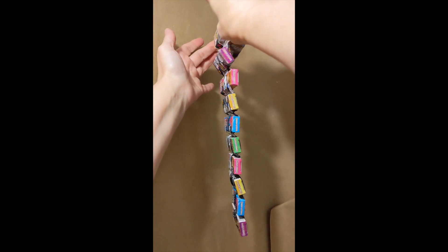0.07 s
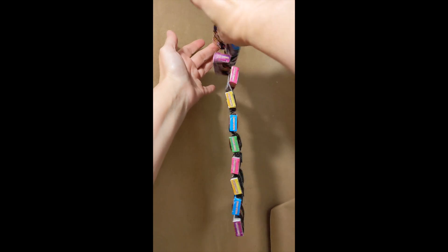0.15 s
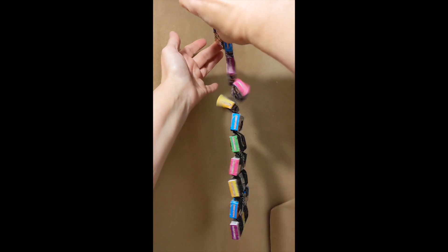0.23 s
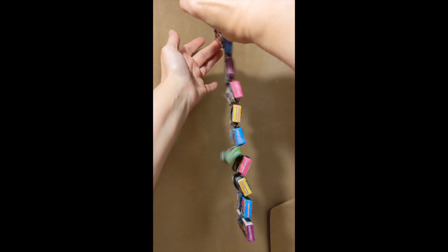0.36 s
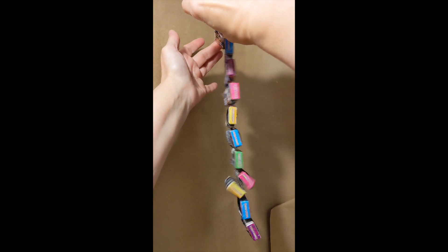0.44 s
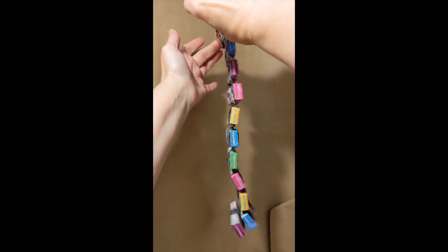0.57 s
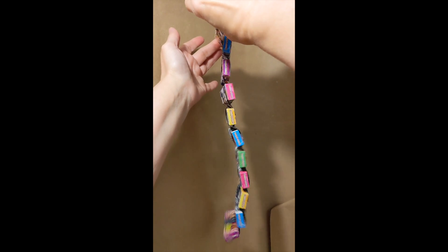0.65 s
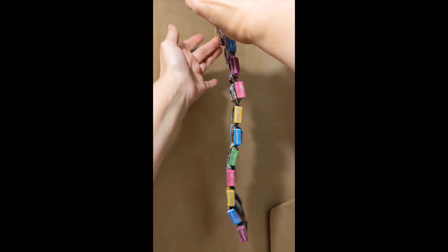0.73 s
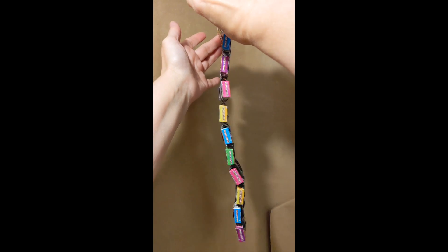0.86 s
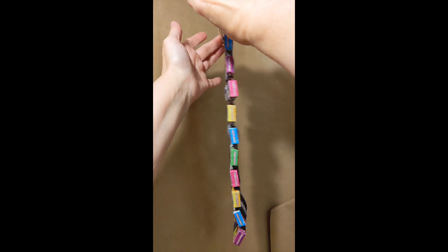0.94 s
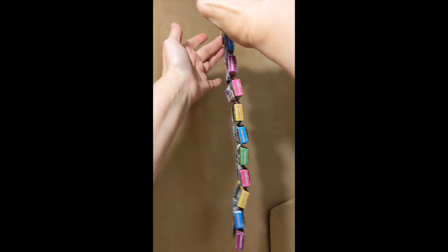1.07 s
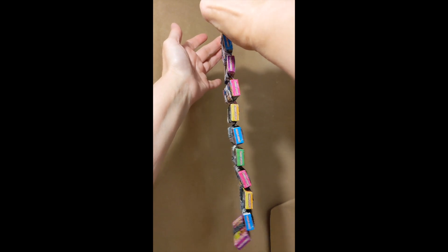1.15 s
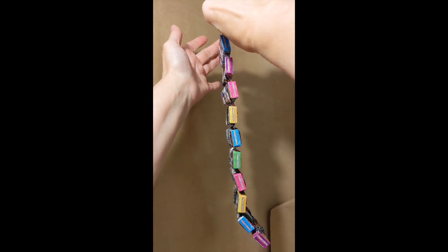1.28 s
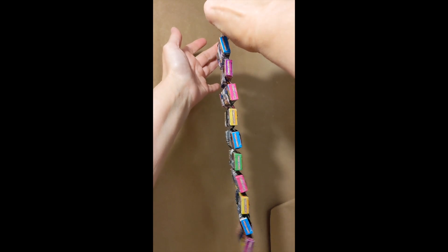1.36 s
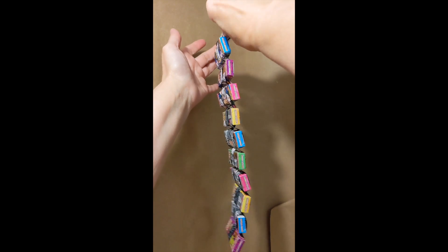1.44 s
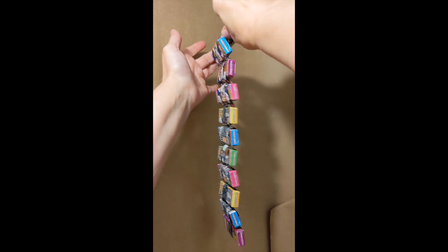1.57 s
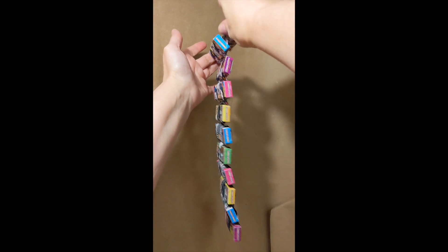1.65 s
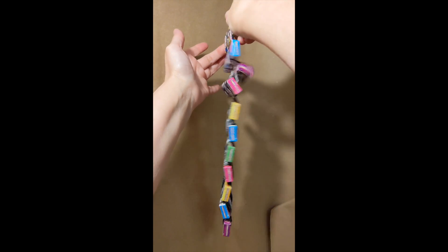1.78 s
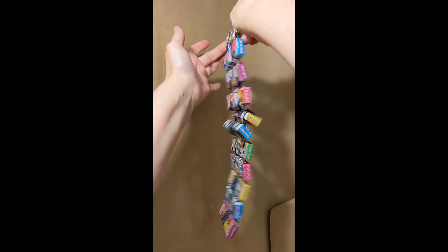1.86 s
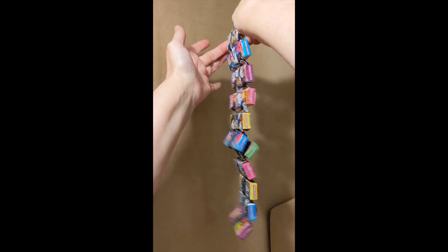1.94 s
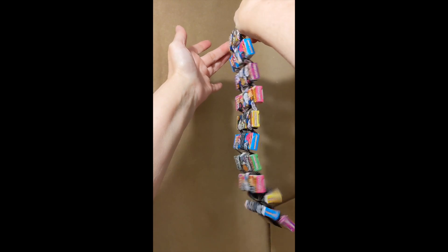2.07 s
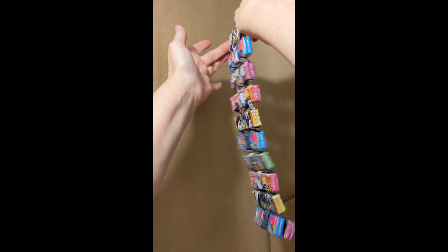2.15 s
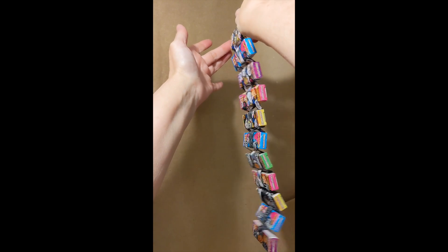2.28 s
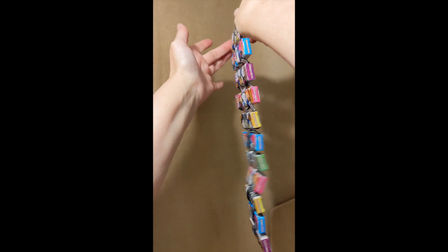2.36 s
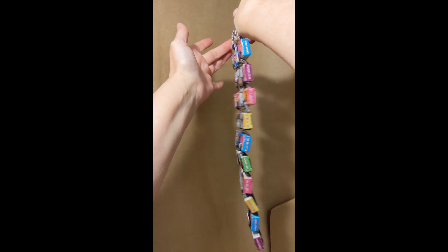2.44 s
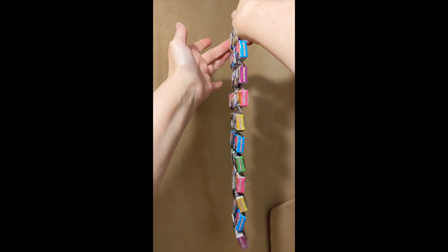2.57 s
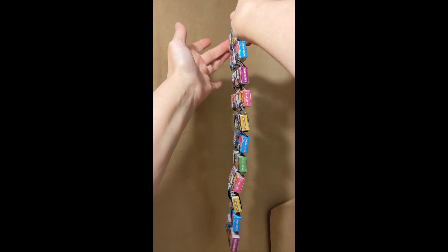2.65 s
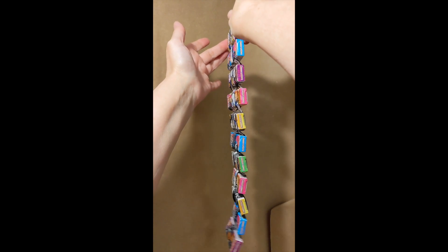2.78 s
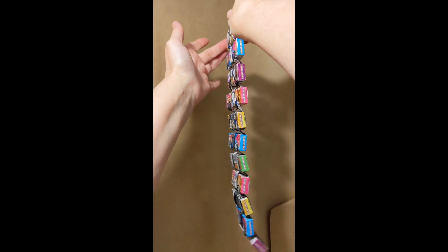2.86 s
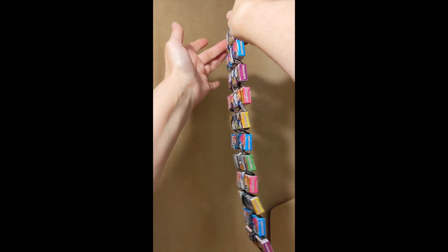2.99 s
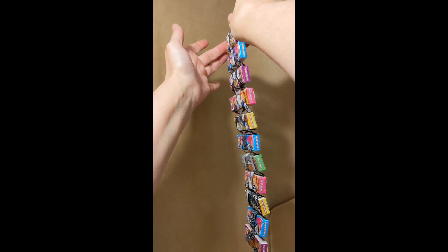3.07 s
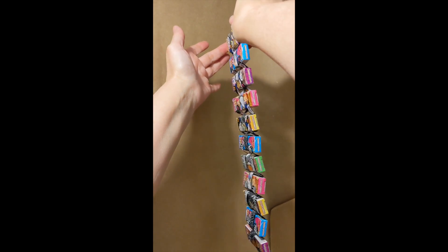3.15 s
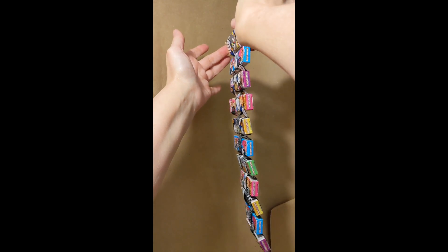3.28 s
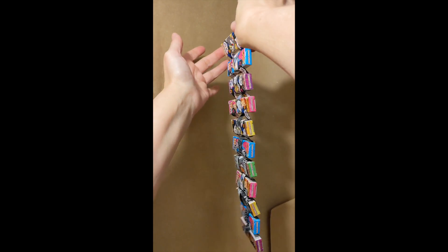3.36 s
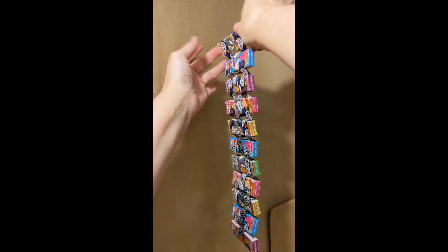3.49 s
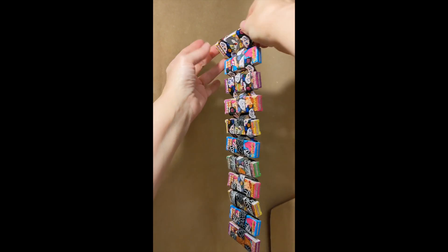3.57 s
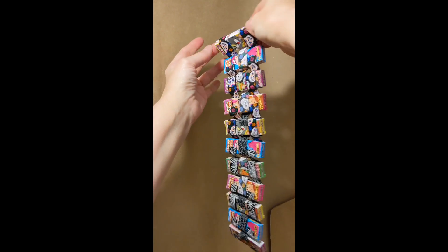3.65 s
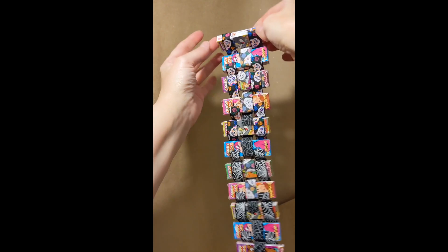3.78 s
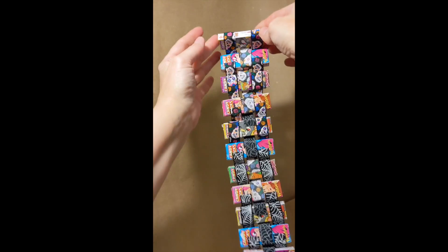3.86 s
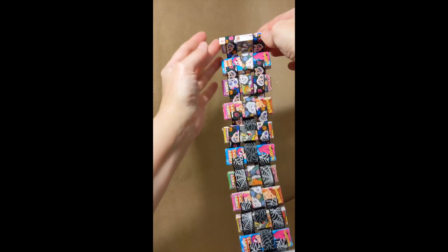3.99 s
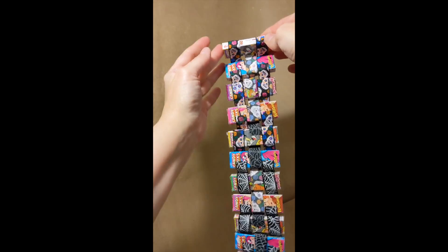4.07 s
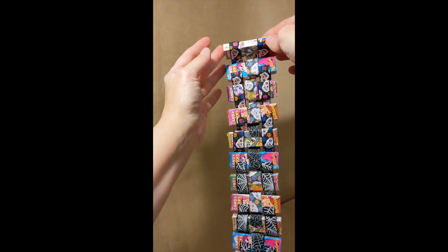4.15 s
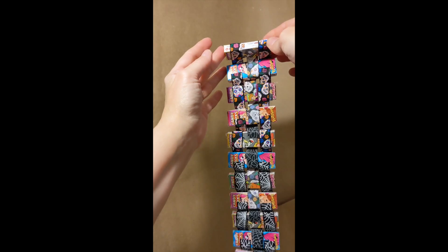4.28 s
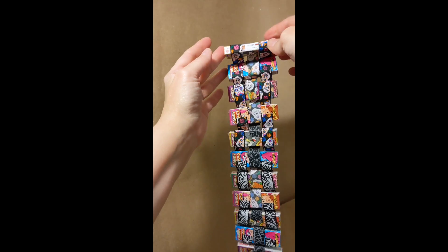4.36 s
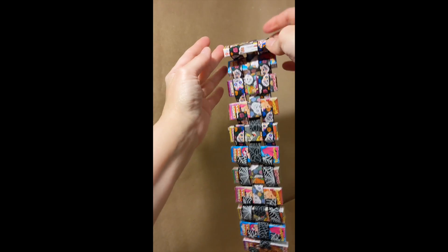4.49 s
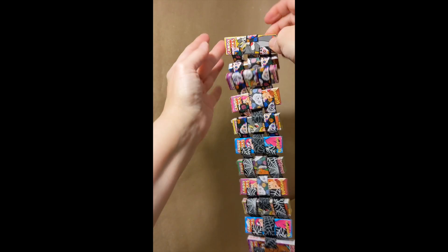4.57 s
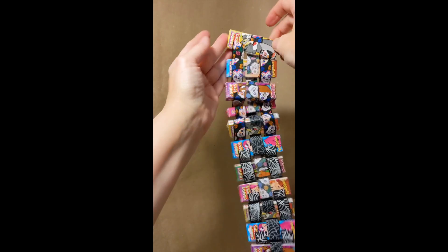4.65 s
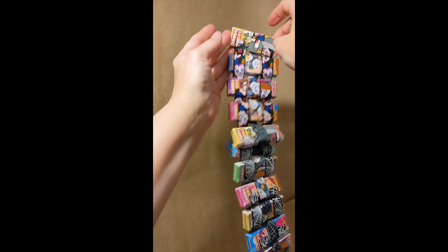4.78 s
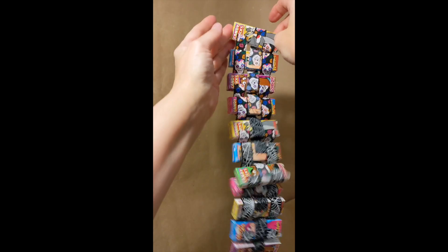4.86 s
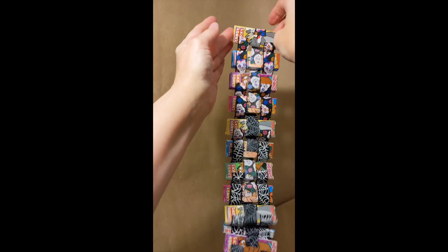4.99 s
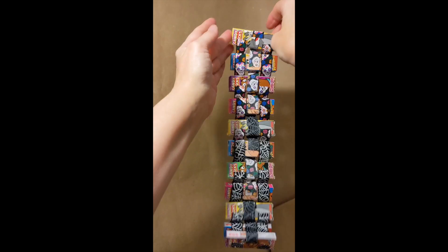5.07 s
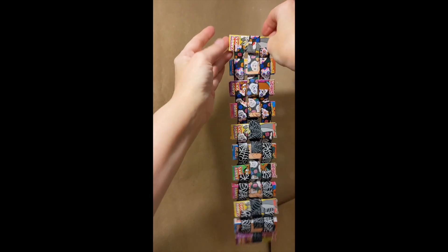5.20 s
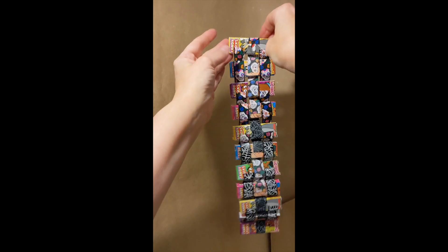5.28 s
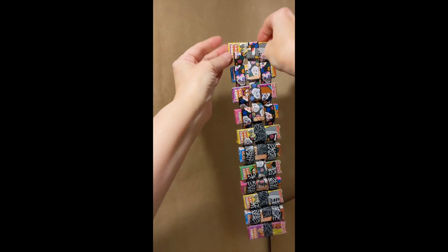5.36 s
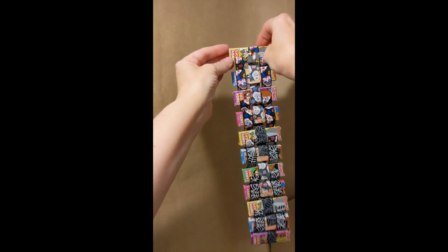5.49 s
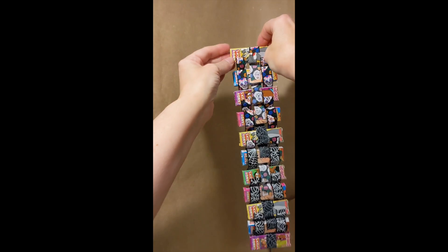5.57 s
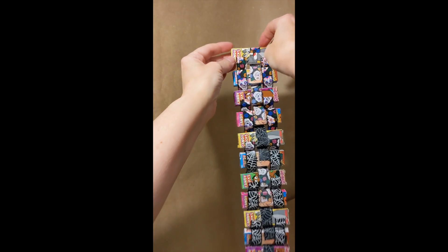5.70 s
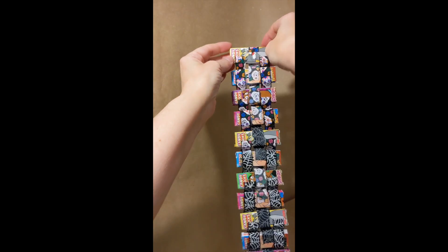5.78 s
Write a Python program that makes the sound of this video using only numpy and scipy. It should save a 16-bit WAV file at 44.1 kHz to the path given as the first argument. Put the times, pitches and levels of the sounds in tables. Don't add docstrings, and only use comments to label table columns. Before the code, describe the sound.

A quiet small room with faint air and a soft low hum, the microphone very close. From about 0.1 s light cardboard boxes on ribbons tumble, dry slaps and papery rattle growing denser and strongest around 0.4-0.7 s. From 0.8 to 1.75 s only thin, irregular ticks and soft ribbon rustle remain. A second cascade runs from 1.8 to 2.45 s, brisk and crisp, loudest near 2.2 s, then breaks into ticks that grow sparse through 4.5 s. A barely audible bump comes at 3.5 s; dull padded knocks lean left at 4.0, 4.2 and 4.3 s, the last strongest with a sharp click. The third tumble bursts in at 4.6 s, eases briefly, and clatters hard from 4.8 to 5.2 s. Ticks and rattle trail to the end, with low air buffeting on the left at 5.2-5.7 s and knocks near 5.4 and 5.55 s. Echo is short and faint.

```python
import sys
import numpy as np
from scipy import signal
from scipy.fft import rfft, irfft, next_fast_len
from scipy.io import wavfile
from scipy.ndimage import uniform_filter1d

SR = 44100
rng = np.random.default_rng(int(sys.argv[2]) if len(sys.argv) > 2 else 0)


def boost(x):
    u = np.asarray(x, float) / 20
    return 10 ** u


def dump(signal):
    limited = np.clip(np.atleast_2d(signal).T, -1, 1)
    pcm = np.round(limited * 32767).astype(np.int16)
    wavfile.write(sys.argv[1], SR, pcm)


N = 257103


def rms_one(x):
    return x / np.sqrt(np.mean(x ** 2) + 1e-20)


def in_time(rows, outside=None):
    s, *columns = np.transpose(rows)
    return [np.interp(np.arange(N) / SR, s, c, outside, outside) for c in columns]


def at_hz(points, hz):
    point_hz, value = np.array(points).T
    return np.interp(np.log(hz), np.log(point_hz), value)


def high_pass(x, order, hz):
    return signal.sosfilt(signal.butter(order, hz, "high", fs=SR, output="sos"), x)


def ring(clicks, hz, t60):
    r, w = boost(-60 / (t60 * SR)), 2 * np.pi * hz / SR
    return signal.lfilter([0, np.sin(w)], [1, -2 * r * np.cos(w), r * r], clicks + 1e-18)


def drift(rate, count):
    r = np.exp(-80 * np.pi * rate / SR)
    settle = 500
    slow = signal.lfilter([1], [1, -2 * r, r * r], rng.standard_normal((count, N // 40 + settle + 1)))
    slow = slow[:, settle:]
    return slow / slow.std()


def banded_noise(spectrum, top):
    # pitch in Hz, likeness from -1 to 1.
    likeness = [(60, 0.18), (130, 1), (290, 0.77), (640, 0.39), (1410, -0.66), (3100, 0.32), (6820, -0.13),
                (15000, 0.024)]
    out, edges = 0, 22 * 2 ** np.arange(0, top, .5)
    white = rng.standard_normal((2, 2, N))
    for k, (low, high) in enumerate(zip(edges, edges[1:])):
        band = signal.butter(2, [low, high], "band", fs=SR, output="sos")
        mid, side = signal.sosfilt(band, white[k % 2])
        hz = np.sqrt(low * high)
        alike = np.clip(at_hz(likeness, hz), -1, 1)
        stereo = np.sqrt(1 + alike) * mid + np.sqrt(1 - alike) * side * [[1], [-1]]
        out = out + boost(at_hz(spectrum, hz)) * stereo
    return rms_one(out)


def room_air():
    # pitch in Hz, level in dB per Hz.
    air_colour = [(15, -35), (25, -39), (64, -7), (148, 0), (267, -9), (433, -7.5), (700, -17), (1450, -21),
                  (1850, -7.5), (3170, -36), (3720, -46), (5580, -27.5), (8810, -30), (15500, -39.5)]
    level_db = -60.5 + 1.3 * drift(8.2, count=1)[0][np.arange(N) // 40]
    return boost(level_db) * banded_noise(air_colour, 9.6)


def hum():
    pitch_hz, width_hz, level_db = 61, 9, -61.5
    return boost(level_db) * rms_one(ring(rng.standard_normal(N), pitch_hz, np.log(1000) / np.pi / width_hz))


def draught(evenness=0.54):
    # time in seconds, level in dB.
    puff = [
        (5.1, -64),
        (5.212, -40.5),
        (5.218, -31),
        (5.36, -32.5),
        (5.38, -45),
        (5.455, -48.5),
        (5.52, -56.5),
        (5.58, -47.5),
        (5.75, -84),
    ]
    # pitch in Hz, level in dB per Hz.
    gust_colour = [(15, -45), (25, -5), (65, 9), (124, 4), (190, -5.5), (240, -20), (464, -64), (500, -28),
                   (650, -58), (1100, -120)]
    eddies = banded_noise(gust_colour, 4.6)
    eddies = eddies / uniform_filter1d(eddies ** 2, SR // 30) ** (evenness / 2)
    left, right = eddies * boost(in_time(puff, -120)[0] + 5.5)
    return np.array([left, boost(-30) * right])


def knocks(thud_s=0.033, contact_s=0.0034, chatter_s=0.0044, pan_db=4.5, lead=16):
    # start in seconds, peak in dB, thud in Hz, snap in dB, snap in Hz.
    blows = [
        (3.53, -50.5, 240, 7.5, 545),
        (3.9761, -32, 243, -5, 1099),
        (4.182, -31.5, 159, -7.5, 800),
        (4.188, -40, 75, -9, 298),
        (4.2803, -26.5, 266.8, 5.5, 1335),
        (5.388, -32, 271.1, 1.5, 630),
        (5.559, -30.5, 255, 17, 1237),
    ]
    # pitch as a ratio, level in dB, fade by 60 dB in seconds.
    snap_modes = [(0.36, -29, 0.023), (0.58, -3, 0.063), (.8, -26, 0.012), (1, 11.5, 0.025),
                  (1.22, 3, 0.02), (1.71, -14, 0.026)]
    out, t = np.zeros((2, N)), np.arange(int(.15 * SR)) / SR
    soft = np.sin(np.pi * np.minimum(t / contact_s, 1)) ** 2
    chances = rng.standard_normal((len(blows), len(t)))
    for (s, peak_db, thud_hz, snap_db, snap_hz), luck in zip(blows, chances):
        blow = 0.12 * luck * np.exp(-t / chatter_s) + (t == 0)
        blow = signal.lfilter([.09], [1, -1.4, .49], blow)
        snap = -sum(boost(db) * rms_one(ring(blow, ratio * snap_hz, t60)) for ratio, db, t60 in snap_modes)
        push = high_pass(np.gradient(soft), 2, 0.7 * thud_hz)
        thud = ring(push, thud_hz, thud_s * boost(0.6 * min(snap_db, 0)))
        overtone = ring(blow, 2.0 * thud_hz, 1.5 * thud_s)
        parts = (thud, 0), (overtone, -12.0), (snap, snap_db)
        hit = sum(boost(peak_db + db) * v / np.abs(v).max() for v, db in parts)
        for side, late in enumerate((0, int(lead))):
            at = int(s * SR) + late
            out[side, at:at + len(t)] += hit * boost(pan_db * (.5 - side))
    return high_pass(out, 2, 45)


def ticks():
    # start in seconds, peak in dB, breadth in dB of the hollow and crisp
    # parts, pitch in Hz.
    tick_rows = [(0.8219, -40.5, -37, 2330), (0.8772, -38, -15, 2600), (0.968, -50.5, 9, 1922),
                 (1.0002, -42.5, 3, 1809), (1.0561, -36.5, -4.5, 1790), (1.121, -43, 0, 2410),
                 (1.1624, -44, -44, 2431), (1.1745, -37, -46, 2910), (1.194, -55, -34, 1870),
                 (1.4201, -35.5, -25, 2450), (1.44, -46, -20, 2031), (1.4769, -42, -10, 1960),
                 (1.5734, -40.5, -5, 1840), (1.6603, -42.5, 2, 2170), (1.6894, -42.5, 0, 1920),
                 (2.541, -33.5, -6, 2140), (2.554, -31.5, -18, 3080), (2.582, -40.5, -23, 2000),
              (2.64, -40, -15, 3060), (2.655, -37, -9, 1730), (2.6755, -38.5, -11, 1912),
              (2.773, -43, -7, 1930), (2.8318, -41, -22, 2490), (2.854, -48.5, -24, 1870),
              (2.9257, -39, -16, 1940), (2.962, -46, -30, 1863), (3.0088, -47.5, -25, 1870),
              (3.0214, -43, -4, 1904), (3.09, -42, -9, 1860), (3.1094, -43.5, -29, 2123),
              (3.242, -45.5, -5, 2122), (3.2684, -41.5, -19, 2060), (3.331, -40.5, -26, 2520),
              (3.411, -42.5, -24, 3280), (3.558, -43, -22, 1942), (3.6044, -47, -4, 1639),
              (3.7673, -38.5, -19, 2080), (4.037, -42.5, -34, 1769), (4.2805, -21, -7, 3280),
              (4.356, -45, -51, 2600), (4.4504, -45.5, -18, 1590), (4.509, -40.5, -8, 1980),
              (4.5405, -42, -4, 2526),
                 (5.2231, -34, -31, 1600), (5.2622, -30.5, -16, 1561), (5.2932, -30, -3.5, 1999),
              (5.339, -35.5, -10, 2360), (5.369, -39, -54, 2940), (5.4071, -33.5, -20, 2900),
              (5.4349, -34.5, -14, 3100), (5.474, -35, -10, 1660), (5.5355, -44, -30, 3150),
              (5.6177, -37, -45, 3020), (5.639, -38, -15, 3240), (5.6612, -39.5, -3, 2010),
              (5.681, -36.5, -26, 2130), (5.691, -35, -20, 3050), (5.741, -41, -9, 1800),
              (5.7692, -39.5, -10, 1960), (5.7933, -38, -8, 1930),
                 (0.1057, -39.5, -13, 2980), (0.1243, -42, -16, 1960), (0.752, -40, -14, 1920),
             (0.7801, -43, -14, 1760), (0.867, -40.5, -20, 2990), (0.8868, -48, -18, 2930),
             (0.8972, -51, -14, 3180), (0.9764, -44, -12, 1900), (1.0107, -56, -11, 1930),
             (1.0855, -48, 6, 1961), (1.1373, -39.5, -16, 1850), (1.1832, -45, -2, 1960),
             (1.3878, -65, -14, 2840), (1.4585, -51, -16, 1900), (1.6352, -56, -14, 1960),
             (1.648, -47, -21, 2250), (1.7146, -44.5, 2, 2710), (1.7574, -49.5, 6, 2334),
             (2.4497, -32.5, -8, 1820), (2.5255, -39.5, -9, 1988), (2.6014, -50, -14, 2080),
             (2.6307, -47.5, 0, 1720), (4.184, -39.5, -8, 2200), (3.9, -57, 0, 2024),
             (2.7935, -50, -18, 1884), (2.8853, -49, -14, 1610), (2.9087, -61, -14, 1989),
             (2.9931, -50, -20, 1860), (3.2136, -46.5, -5, 1850), (3.398, -51, -4, 2030),
             (3.4488, -45, -5, 1993), (3.5078, -43.5, -17, 2040), (0.4972, -29, -14, 2900),
             (0.629, -47, -16, 2800), (0.645, -47, -14, 2500), (.729, -33, -18, 2400),
             (3.687, -53, -5, 1760), (3.9235, -51, -2, 2200), (4.0506, -45, -16, 2470),
             (4.3873, -56, -16, 2620), (4.4202, -49, -26, 2208), (4.5645, -56, -14, 2134),
             (4.582, -44, -6, 3300), (5.2405, -33.5, -16, 2190), (5.2774, -34, -11, 1980),
             (5.4939, -44, -9, 1573), (5.575, -39, -19, 1676)]
    return tick_rows


def slaps():
    # start in seconds, peak in dB, hollow part in dB, crisp part in dB, cluster length in seconds.
    tumble_1 = [(0.078, -47, -18, 4, 0.0056), (0.1625, -34.5, -19, -1.5, 0.0075),
                (0.177, -44.5, -5, 7, 0.027), (0.2314, -34.5, -11, -3, 0.0089),
                (0.2458, -46.5, -12, 9.5, 0.0051), (0.293, -34.5, -2, 3, 0.0088),
                (0.303, -31, -15, -13, 0.0071), (0.329, -28.5, -8.5, -5, 0.012),
                (0.3706, -28, -13, 1.5, 0.0062), (0.4052, -35, -13, -10, 0.008),
                (0.425, -25, -6, -0.5, 0.0038), (0.5137, -29.5, -15, -7, 0.013),
                (0.5312, -22, -11, -8.5, 0.0043), (0.5668, -43, 2, -15, 0.0037),
                (0.5945, -21, -8, -6, 0.014), (0.627, -42, -30, -23, 0.0082),
                (0.671, -32.5, -3, -7.5, 0.013), (0.680, -26.5, -7, -16, 0.01),
                (0.7072, -30, -22, -0.5, 0.006), (0.7509, -37, -13, -20, 0.0028)]
    tumble_2 = [(1.8004, -30, -5.5, -7.5, 0.0073), (1.809, -34, -2.5, 0, 0.03),
                (1.8416, -28, -10, 0.5, 0.0091), (1.87, -27.5, -3.5, -1.5, 0.015),
                (1.905, -26.5, -6, 0.5, 0.013), (1.9714, -26, -3, -2, 0.005),
                (1.9925, -32.5, -20, -7, 0.0072), (2.0231, -27.5, -15, -2.5, 0.0062),
                (2.0454, -24, -27, -5, 0.013), (2.0752, -29, -9, 3.5, 0.0025),
                (2.1093, -48, -17, -15, 0.0059), (2.1453, -25.5, -13, -2.5, 0.012),
                (2.1756, -27, -5.5, 0.5, 0.012), (2.2217, -20, -27, 0, 0.0095),
                (2.232, -22, -5.5, -6, 0.0023), (2.2841, -29.5, -7, -10, 0.012),
                (2.3521, -38, -23, -8, 0.0058), (2.3656, -33, -17, -16, 0.0096),
                (2.3752, -29, -3, -8.5, 0.0097), (2.3873, -30.5, -21, -14, 0.0052),
                (2.4031, -29.5, -18, -16, 0.012), (2.4612, -30.5, -22, -10, 0.01)]
    tumble_3 = [(4.6064, -24.5, -4.5, -3, 0.0024), (4.6107, -29, -23, 8.5, 0.0052),
                (4.614, -21.5, -6, -2, 0.003), (4.6202, -31.5, -1, 3, 0.01), (4.6857, -33.5, 10, 5, 0.002),
                (4.690, -31.5, -5, 3, 0.004), (4.7167, -35.5, -7, -2, 0.0094), (4.8317, -31, 1, -1, 0.005),
                (4.8553, -28, -7, 0, 0.0088), (4.873, -26, -8.5, -25, 0.007), (4.907, -20, -10, -10, 0.017),
                (4.9661, -30, -5.5, -6.5, 0.02), (4.987, -32.5, -12, -6, 0.0077),
                (5.023, -28, -19, -23, 0.004), (5.0486, -26, -21, -5.5, 0.005),
                (5.0519, -27, -20, -15, 0.0059), (5.078, -28, -2.5, -2.5, 0.005),
                (5.0821, -28.5, -1.5, -5, 0.0047), (5.1176, -32.5, -10, -3.5, 0.004),
                (5.1559, -24.5, -4, -21, 0.014), (5.1701, -31, -15, -7, 0.0037),
                (5.149, -35, -4, -3, 0.006), (5.1928, -24, -2, 4, 0.0025), (5.197, -24.5, -20, 3, 0.0012),
                (5.5592, -33.5, -10, -15, 0.0087)]
    tick_s = .0032
    short = [(s, db - 3.5, -7.5 + 0.37 * wide_db, wide_db, tick_s) for s, db, wide_db, _ in ticks()]
    return [*tumble_1, *tumble_2, *tumble_3, *short]


def shaking(crest_db=-5.5, slow_rise=0.52, clump_db=0.0, clumps_hz=45, surge_db=-0.8, surges_hz=9):
    # time in seconds, rattle level in dB.
    swing = [(0, -64.5), (.1, -59), (.4, -44.5), (.65, -59.5), (1.2, -77), (1.35, -70.5), (1.65, -60),
             (1.77, -61), (2.09, -38), (2.33, -52.5), (2.72, -73), (3.2, -69), (4.12, -59), (4.48, -69.5),
             (4.66, -45), (5.05, -43.5), (5.5, -60.5), (5.83, -57.5)]
    # start in seconds, peak in dB, hollow part in dB,
    # crisp part in dB, length in seconds.
    swells = [(0.488, -32, -10, -8, 0.025), (0.702, -21, -38, -28, 0.0024), (.895, -40, -16, -13, 0.047),
              (1.181, -41, -28, -24, 0.032), (1.292, -38.5, -2, -3, 0.012), (2.204, -23, -14, -17, 0.018),
              (2.298, -33, -16, -4, 0.014), (3.718, -43.5, -17, -6, 0.093), (4.03, -55.5, -6, 4, 0.11),
              (4.603, -34, -15, 2, 0.0082), (4.82, -36.5, -1, 1.5, 0.017), (5.186, -25, -3, -16, 0.008),
              (5.384, -29, -3.5, -31, 0.017)]
    # start in seconds, peak in dB, hollow part in dB, crisp
    # part in dB, length in seconds.
    more_swells = [(.005, -45, 8, -3, 0.0031), (0.135, -50, -14, 6.5, 0.019), (0.337, -32.5, -16, -9, 0.052),
                   (0.46, -36, -9, -14, 0.024), (0.777, -43, -2.5, -6.5, 0.039),
                   (0.918, -41.5, -2.5, -4.5, 0.018), (1.015, -45, -3.5, -6, 0.091),
                   (1.094, -43.5, -6, -20, 0.027), (1.21, -48, -19, -7, 0.035), (1.446, -58, -12, -19, .04),
                   (1.653, -50.5, -25, 1.5, 0.054), (2.495, -48, -20, -13, 0.032), (2.592, -46, -7, -14, .03),
                   (2.689, -46.5, -6, -20, 0.017), (2.756, -49.5, -18, -5, 0.023), (2.845, -49, -12, -21, 0.021),
                   (3.115, -48.5, -15, -19, 0.042), (3.42, -55, -12, -7, 0.064), (3.592, -49, -25, -2, 0.034),
                   (4.531, -45.5, 6.5, -2, 0.0051), (4.625, -42, -8, 6.5, 0.041), (4.726, -41.5, 2, 2, 0.027),
                   (4.799, -52, -12, -11, .03), (4.938, -43, -13, -8, 0.019), (5.005, -30, -19, -12, 0.024),
                   (5.091, -31, -10, 0.5, 0.014), (5.2, -46, -12, -15, 0.013), (5.316, -38, -18, -17, .03),
                   (5.59, -43.5, -0.5, -24, .025)]
    after_db, after_s = -15, 0.022
    soft_s = .014
    scuff_lead_s = .0014

    lumps_db = clump_db * drift(clumps_hz, count=1) + surge_db * drift(surges_hz, count=1)
    lumps_db = lumps_db[0][np.arange(N) // 40]
    usual_db = -52
    swing_db = in_time(swing)[0] - usual_db
    colour_db = np.array([[0], [-7.5], [-8]])
    follows = [[1], [0.82], [0.83]]
    power = boost(2 * (colour_db + usual_db + swing_db * follows))
    clusters, t = 0 * power, np.arange(int(.15 * SR)) / SR
    since = np.maximum(t - scuff_lead_s, 0)
    lead = scuff_lead_s * np.array([[0], [0], [1]])
    slower = np.array([[1], [1], [1.3]])
    for s, peak_db, hollow_db, crisp_db, length in [*slaps(), *swells, *more_swells]:
        length = max(length, .001)
        rise = slow_rise * min(length / soft_s, 1)
        at = max(int((s - rise * length - scuff_lead_s) * SR), 0)
        start = np.clip((t - scuff_lead_s + lead) / (rise * length * slower + lead), 0, 1) ** 2
        parts_db = peak_db + crest_db + np.array([[0], [hollow_db], [crisp_db]])
        cluster = boost(2 * parts_db) * start * np.exp(-2 * since / length)
        chatter = boost(2 * (peak_db + after_db + colour_db)) * start * np.exp(-2 * since / after_s)
        clusters[:, at:at + len(t)] += cluster[:, :N - at]
        power[:, at:at + len(t)] += chatter[:, :N - at]
    return np.sqrt(power * boost(2 * lumps_db) + clusters)


def boxes(per_s=1300, uneven_db=3.0, per_mode_db=1.5, colour_db=3.0, sway_db=1.0, cycles=26.4, scuff=0.85,
          alike=0.61, lag=6.04, lag_spread=3.2):
    modes = np.array([270, 350, 440, 540, 650, 780, 930, 1090, 1260, 1480, 1650, 1800, 1910, 2100, 2330,
                      2570, 2880, 3220, 3460, 4050, 4500, 5000, 5700, 6500, 7400, 8400, 9700, 11200, 13000,
                      15000])
    # pitch in Hz, level in dB per Hz.
    card = [(250, -23.5), (440, -9), (620, -6), (900, -11.5), (1100, -7.5), (1450, -9.5), (1850, 7),
            (2200, 1.5), (2800, 5), (3400, 0), (3900, -22), (4800, -17.5), (6700, -19.5), (10800, -31.5),
            (15500, -38.5)]
    # pitch in Hz, left over right in dB.
    ports = [(60, 0.0), (110, 0.0), (200, -8), (380, 3.5), (700, 0), (1290, 2.5), (2380, -5), (4400, 1),
             (8120, -1.5), (15000, 1.5)]

    touch = rng.random(N) < per_s / SR
    sizes = boost(uneven_db * np.minimum(rng.exponential(1, N), 4))
    first = (np.array(slaps())[:, 0] * SR).astype(int)
    touch[first], sizes[first] = True, boost(6)
    at = np.flatnonzero(touch)
    firm = np.isin(at, first)
    part = np.where(modes < 1400, 1, np.where(modes > 3700, 2, 0))
    share = boost(at_hz(card, modes)) ** 2 * np.gradient(modes)
    which_box = colour_db * drift(45.0, count=len(modes))[:, at // 40]
    sway = boost(sway_db * drift(34.0, count=1)[:, at // 40] * [[.5], [-.5]])
    paper = scuff * rng.standard_normal((2, N))
    force, out, alike = shaking(), np.zeros((2, N)), np.clip(alike, 0, 1)
    for hz, p, w, favour_db in zip(modes, part, share, which_box):
        other, spread = rng.standard_normal((2, N // 16))[:, :len(at)]
        push = np.where(firm, 1, np.sign(spread[::-1]))
        near = alike ** (hz / (hz + 700))
        hits = np.array([push, near * push + np.sqrt(1 - near ** 2) * other])
        hits = hits * sway * sizes[at] * boost(per_mode_db * spread + favour_db)
        hits = hits / np.sqrt(np.mean(hits ** 2) * len(at) / N)
        clicks = np.roll(paper, int(hz), axis=1) * (p == 2)
        clicks[:, at] = hits / (1 + (hz / 11000) ** 2)
        t60 = cycles / hz * (hz / 2000) ** 0.058
        level = np.sqrt(w / share[part == p].sum()) * boost(at_hz(ports, hz) * np.array([[.5], [-.5]]))
        rung = ring(clicks * force[p], hz, t60) * level / np.sqrt(t60 * SR / (4 * np.log(1000)))
        out[0] += np.roll(rung[0], int(lag + lag_spread * other[0]))
        out[1] += rung[1]
    out = out - 0.35 * signal.lfilter(*signal.iirpeak(3800, 8, SR), out)
    return high_pass(out, 2, 260)


def pings(ping_db=-9.0, narrow=0.33, panel_db=-4.5, chatter_s=0.0015, lag=6):
    # start in seconds, peak in dB, pitch in Hz.
    panels = [(0.2901, -30, 1830), (0.3715, -30, 1850), (0.423, -33, 2800), (0.4329, -20, 1970),
              (0.5311, -12.5, 1781), (0.595, -27, 1970), (0.6814, -24, 1090), (0.7018, -21.5, 1235),
              (0.708, -15.5, 1770), (1.8392, -21.5, 2240), (1.8714, -22, 1990), (1.9061, -18, 1980),
              (1.9718, -22, 1760), (2.0462, -26, 1829), (2.0747, -29, 2160), (2.1103, -35, 1860),
              (2.1762, -18, 1790), (2.2202, -35, 2480), (2.2264, -33, 1900), (2.281, -28, 1847),
              (4.6063, -30, 1110), (4.6146, -13.5, 2470), (4.855, -18.5, 1840), (4.906, -13, 2420),
              (4.965, -26, 1990), (5.0481, -25, 1470), (5.0546, -13, 1670), (5.0809, -15, 1894),
              (5.12, -23, 2220), (5.1547, -38, 1922), (5.1717, -18, 1810), (5.185, -18, 1850),
              (5.1965, -9, 1820), (5.1945, -15, 6600), (4.6127, -22, 7040), (2.2045, -28, 5200),
              (4.2792, -28, 5920)]
    ping_t60_s = .015
    out, t = np.zeros((2, N + SR)), np.arange(int(.04 * SR)) / SR
    rows = ticks() + [(s, db, panel_db, hz) for s, db, hz in panels]
    chances = rng.standard_normal((len(rows), len(t)))
    for (s, db, wide_db, hz), luck in zip(rows, chances):
        touch = luck * np.exp(-t / chatter_s) + 3.4 * (t == 0)
        ping = ring(touch, hz, ping_t60_s)
        for side, late in enumerate((int(lag), 0)):
            at = int(s * SR) + late
            out[side, at:at + len(t)] += boost(db + ping_db - narrow * wide_db) * ping / np.abs(ping).max()
    return out[:, :N]


def room(x):
    t60_s, wall_cut_hz = 0.12, 7200
    size = next_fast_len(N + SR // 2)
    w = 2 * np.pi * np.arange(size // 2 + 1) / size
    dull = 1 / (1 + 1j * w * SR / (2 * np.pi * wall_cut_hz))
    walls = np.zeros((2, len(w)), complex)
    for k, lag in enumerate((rng.uniform(0.0044, .022, 8) * SR).astype(int)):
        loop = boost(-60 * lag / SR / t60_s) * dull * np.exp(-1j * w * lag)
        walls[k % 2] += (-1) ** (k // 2) * loop / (1 - loop)
    return irfft(rfft(x.mean(axis=0), size) * walls, size)[:, :N]


def scene():
    background = room_air() + hum() + draught()
    bumps = knocks()
    ladder = boxes() + pings()
    echoes = room(boost(-10.5) * ladder + boost(-14.5) * bumps)
    return background + bumps + ladder + echoes


def band_limit(x):
    return signal.sosfilt(signal.butter(12, 16450, fs=SR, output="sos"), x)


def record(dry):
    bass_cut = signal.butter(4, 42, "high", fs=SR, output="sos")
    top_cut = signal.cheby2(10, 60, 16500, fs=SR, output="sos")
    mix = signal.sosfilt(np.vstack([bass_cut, top_cut]), dry)
    return band_limit(mix)


dry = scene()
out = record(dry)
dump(out)
```